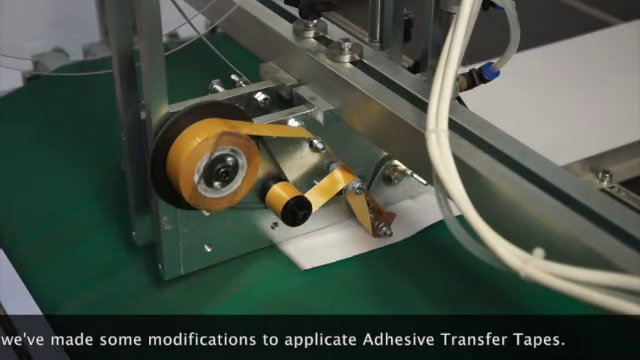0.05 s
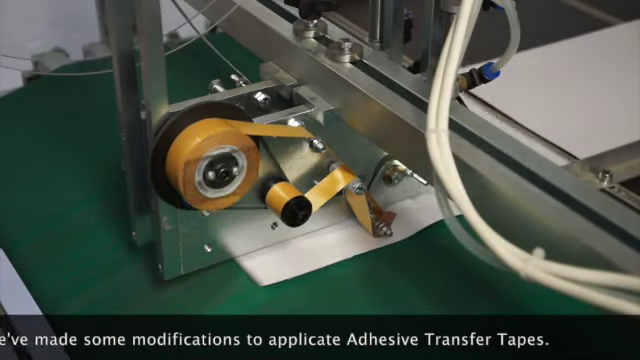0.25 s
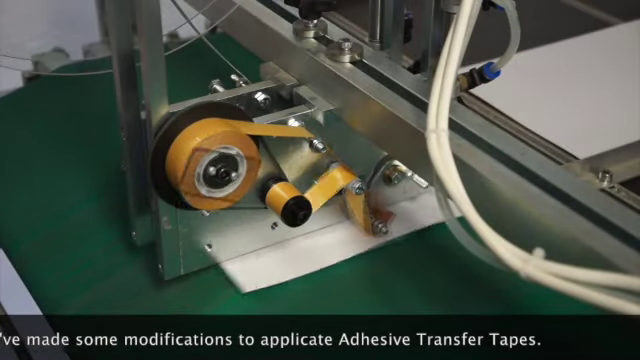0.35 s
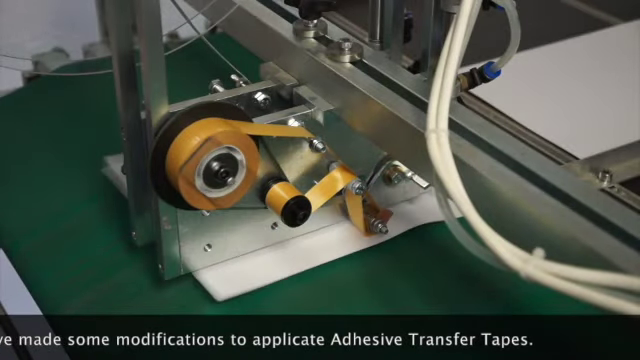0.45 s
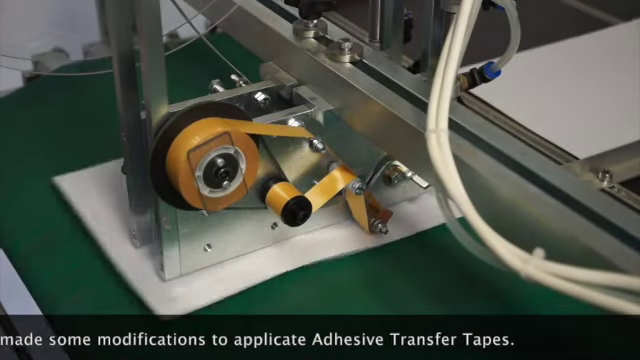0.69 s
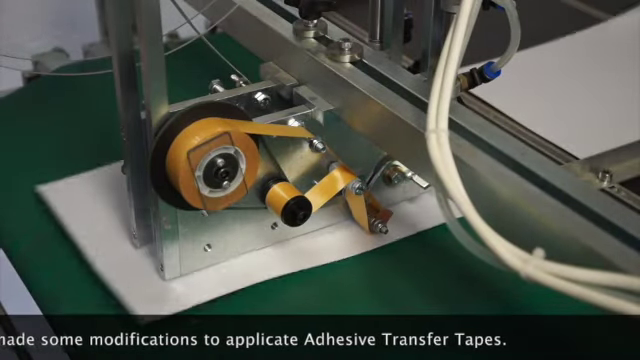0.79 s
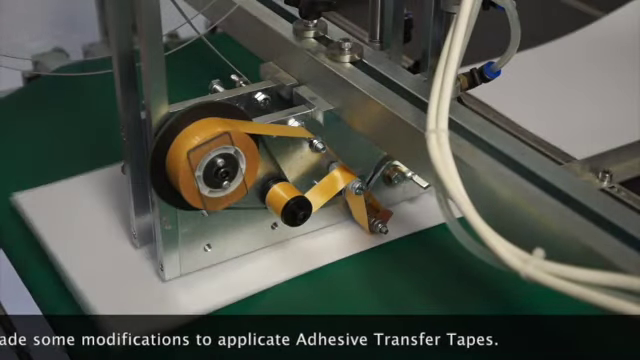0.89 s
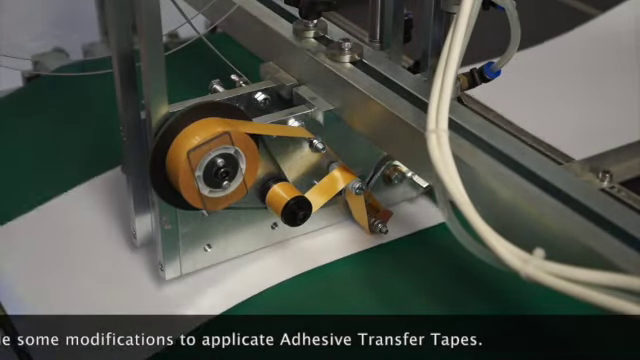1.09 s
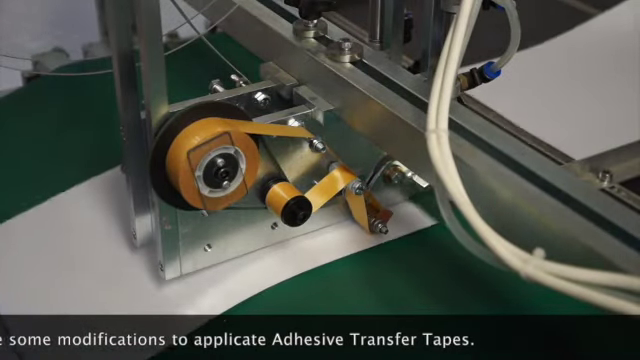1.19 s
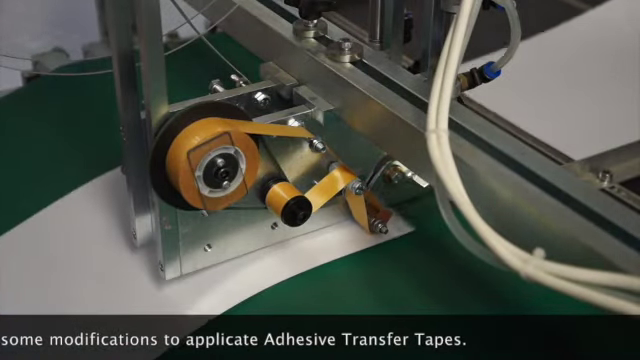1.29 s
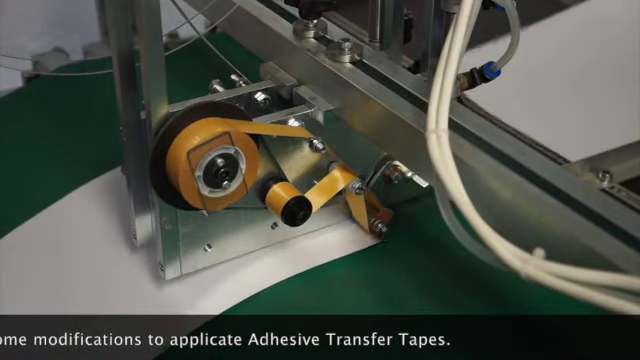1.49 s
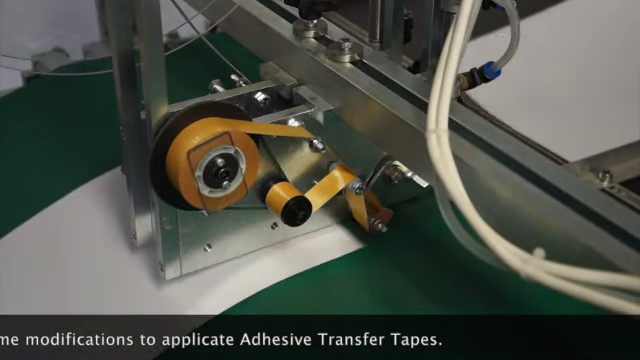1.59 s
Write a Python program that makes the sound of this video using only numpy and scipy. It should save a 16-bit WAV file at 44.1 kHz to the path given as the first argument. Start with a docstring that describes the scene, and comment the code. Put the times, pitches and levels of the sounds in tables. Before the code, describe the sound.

A tape applicator machine runs straight ahead, its conveyor droning under a thin, high motor whine throughout. Sticky tape crackles and squeaks briefly until about 0.3 seconds, when a steel cutter snaps loudly and rings, releasing an air hiss that fades by 0.6. The background dips, then slowly recovers. From about 0.7 to 1.5 seconds, rollers clack unevenly against the metal frame, with a short workshop echo.

```python
"""Sticky tape crackles and squeaks off its reel, over a conveyor belt's drone and a thin motor whine.
Then an air-driven cutter comes down: its steel chatters, snaps and rings, and the air hisses out.
The sheet runs on and the rollers clack, shaking the machine's frame.
A limiter turns everything down at the loud snap and slowly brings it back up."""
import sys
import numpy as np
from scipy import signal
from scipy.fft import rfft, irfft
from scipy.io import wavfile
from scipy.ndimage import uniform_filter1d, minimum_filter1d

SR = 44100
rng = np.random.default_rng(int(sys.argv[2]) if len(sys.argv) > 2 else 0)


def waveform_to_disk(signal):
    """Save audio, clipped to [-1, 1], as 16-bit WAV at the path in sys.argv[1]."""
    frames = np.transpose(np.atleast_2d(signal))
    scaled = np.clip(frames, -1, 1) * 32767
    samples = np.round(scaled).astype(np.int16)
    wavfile.write(sys.argv[1], SR, samples)


N = 72765
TIME = np.arange(N) / SR
STOP_S = 0.328  # the cutter hits its stop


def undb(db):
    """Turn decibels into a volume multiplier."""
    return 10 ** (np.asarray(db) / 20)


def noise():
    """Plain hiss (white noise) of strength 1."""
    return rng.standard_normal(N)


def wander(rate_hz):
    """A smooth random wobble, roughly 1 either way."""
    hold = int(SR / rate_hz)
    steps = np.repeat(rng.standard_normal(N // hold + 2), hold)
    return uniform_filter1d(uniform_filter1d(steps, hold), hold)[:N] * 4 / 3


def fade(start_s, decay_s):
    """Jump to full level, then fall to about a third every decay_s."""
    age = TIME - start_s
    return (age >= 0) * np.exp(-np.maximum(age, 0) / decay_s)


def convolve(x, response):
    """Let every sample of x set off its own copy of the response."""
    return signal.fftconvolve(x, response)[:N]


def colour(x, points, size=4096):
    """Shape the tone along (f/Hz, level/dB) points; white noise keeps its overall power."""
    hz, db = np.array(points, float).T
    f = np.maximum(np.fft.rfftfreq(size, 1 / SR), 1)
    cepstrum = irfft(np.log(undb(np.interp(np.log(f), np.log(hz), db))))
    # fold it in half so the filter never sounds ahead of its input
    cepstrum[1:size // 2] *= 2
    cepstrum[size // 2 + 1:] = 0
    response = irfft(np.exp(rfft(cepstrum)))
    return convolve(x, response / np.linalg.norm(response))


def ring(modes, start_s=0):
    """The dying notes of a struck object; each drops 60 dB over its ring time."""
    age = TIME - start_s
    return sum(undb(db) * fade(start_s, ring_s / np.log(1000)) * np.sin(2 * np.pi * hz * age)
               for hz, db, ring_s in modes)


def tones(notes, waver_db, drift_hz):
    """Held notes that waver a little in level and pitch."""
    total = 0
    for hz, db in notes:
        level = np.sqrt(2) * undb(db + waver_db * wander(9.25))
        cycles = rng.random() + np.cumsum(hz + drift_hz * wander(12.03)) / SR
        total += level * np.sin(2 * np.pi * cycles)
    return total


def room(x, echo_db, ring_s=0.33):
    """The sound plus the workshop's short echo."""
    tail = noise() * fade(0.003, ring_s / np.log(1000))
    return x + undb(echo_db) * convolve(x, tail / np.linalg.norm(tail))


def tape(snaps_per_s=9000):
    """The glue lets go in many tiny snaps, surging as the reel is tugged."""
    # tone of the peeling: f/Hz, level/dB
    peel_tone = [(30, -9), (100, -21), (150, 1.5), (200, -10), (280, -4.5), (400, -8.5), (680, -0.5),
                 (1000, -1.5), (1800, -0.5), (2200, 0.5), (3300, 3.5), (4200, -1), (5300, -4), (7200, 5),
                 (9000, 2.5), (11000, -10.5)]
    # loudness of the peeling: t/s, level/dB
    peel_levels = [(0, -35), (.1, -38), (.195, -37), (.225, -35.5), (.29, -35), (.33, -32.5), (.42, -45),
                   (.56, -51)]
    snaps = (rng.random(N) < snaps_per_s / SR) * np.sign(noise())
    snaps *= undb(2 * np.minimum(rng.exponential(size=N), 7))  # a few are much louder
    level_db = np.interp(TIME, *np.array(peel_levels).T) + 2.16 * wander(110.3)
    return colour(snaps / snaps.std(), peel_tone) * undb(level_db)


def belt():
    """The conveyor belt drones and its drive hums."""
    # tone of the drone: f/Hz, level/dB
    drone_tone = [(25, -13), (80, -10), (120, -12.5), (185, -7), (240, 3), (320, -3.5), (420, -6.5),
                  (720, -2.5), (1000, -12), (1400, -10.5), (2200, -10.5), (4500, -11.5), (7500, -7),
                  (9000, -15), (11000, -17)]
    # notes of the drive: f/Hz, level/dB
    hum_notes = [(150, -63.5), (225, -60.5), (299, -54.5), (490, -60.5), (597, -60)]
    drone = colour(noise(), drone_tone) * undb(-42.5 + 0.69 * wander(14.1))
    return drone + tones(hum_notes, waver_db=3, drift_hz=2.98)


def motor(fizz_hz=6130, half_width_hz=560):
    """The motor whines: thin, high notes in a narrow band of fizz."""
    # notes of the whine: f/Hz, level/dB
    whine_notes = [(5656, -49.5), (5805, -50), (5975, -83), (6076, -46), (6345, -49.5), (6395, -64),
                   (6495, -50.5), (6644, -52), (6675, -53), (6794, -60)]
    f = np.fft.rfftfreq(N, 1 / SR)
    band = np.exp(-0.5 * ((f - fizz_hz) / half_width_hz) ** 6)
    fizz = irfft(rfft(noise()) * band, N)
    return tones(whine_notes, waver_db=0.5, drift_hz=1.87) + undb(-45) * fizz / fizz.std()


def squeaks(width_hz=250):
    """The tape gives short, hissy squeaks as it pulls tight."""
    # squeaks: middle t/s, half length/s, f/Hz, level/dB
    rasps = [(0.038, 0.0041, 2930, -38.5), (0.241, 0.012, 3280, -39.5), (0.285, 0.0057, 2660, -35),
             (0.296, 0.0017, 2750, -39)]
    hiss = undb(-4.5) * colour(noise(), [(4000, -29), (7400, 2), (11000, -5)])
    total = 0
    for at, half, hz, db in rasps:
        squeak = signal.lfilter(*signal.iirpeak(hz, hz / width_hz, fs=SR), noise())
        swell = undb(db) * np.exp(-((TIME - at) / half) ** 2)
        total += swell * (squeak / squeak.std() + hiss)
    return total


def cutter():
    """Steel chatters in bright, gritty ticks and rings at its stop; it ticks again on release."""
    # ticks of the steel: t/s, level/dB, f/Hz, half length/s
    chatter = [(.3114, 5.5, 7040, 0.00048), (0.3146, 1, 6900, 0.0006), (.3176, 4.5, 7400, 0.00013),
               (0.3282, 3, 6940, 0.0006), (0.3312, 0.5, 8300, 0.00044), (.3319, 2, 7200, 0.00048),
               (.333, 1, 7200, 0.00045), (.335, -0.5, 7500, .0004), (.3376, 0.5, 7500, 0.00044),
               (0.8861, -14.5, 7600, .00016), (0.8877, -22, 7240, 0.00067)]
    # ringing notes of the cutter: f/Hz, level/dB, ring time/s
    steel_notes = [(258.5, -26.5, 0.43), (303, -27.5, 0.53), (2353, -34, 0.42), (3150, -10.5, 0.057),
                   (3157, -34.5, 0.63), (3420, -29, 0.58), (6660, -21, 0.075), (6830, -11, 0.082),
                   (7138, -28, 0.17), (7330, -15.5, 0.14), (7469, -25, .2), (7560, -39, .28),
                   (7730, -52, .5), (8310, -37, .45), (8328, -43, .5), (10050, -15, 0.063)]
    ticks, grit_power = 0, 0
    for at, db, hz, half in chatter:
        age = TIME - at
        ticks += undb(db) * np.exp(-(age / half) ** 2) * np.cos(2 * np.pi * hz * age)
        grit_power += (undb(db) * fade(at - half, decay_s=0.0073)) ** 2
    hiss = colour(noise(), [(1500, -13.5), (4500, -4), (7000, -1.5), (9000, 0.5), (11000, -16.5)])
    grit = undb(-17) * np.sqrt(grit_power) * hiss
    return room(ticks + grit, echo_db=-7) + ring(steel_notes, STOP_S)


def clacks():
    """The arm and rollers hit the frame; each blow cracks, rattles, rings and thumps."""
    # blows: t/s, level/dB, ring f/Hz, relative thump/dB, relative crack/dB, rattle decay/s
    hits = [(0.3165, 9.5, 875, -3, -10.5, 0.0063), (0.3278, 5, 3050, 1, -1, 0.011),
            (0.717, -15.5, 7500, -22, -21, .015), (0.8598, -8, 1940, -8, -7, 0.0043),
            (.8645, -4, 2000, -10.5, -7, .003), (0.8933, -5.5, 3900, -19, -3, 0.031),
            (1.0439, -11, 3220, -8, -8, 0.0069), (1.089, -21, 3000, -12, -6, 0.0042),
            (1.1135, -23, 2800, 6.5, -5, 0.0083), (1.1458, -13.5, 2600, -12, -4, 0.029),
            (1.1908, -13, 2730, -7, -7, 0.013), (1.2297, -12.5, 2360, -21, 2, 0.0045),
            (1.237, -8, 2820, 4.5, -1.5, .008), (1.3044, -6, 704, -17, -3, 0.0014),
            (1.308, 1.5, 2870, -8.5, -1.5, 0.0064), (1.358, -4, 1670, -3.5, 1.5, 0.0048),
            (1.491, -8, 2730, -4.5, -7.5, 0.0083)]
    # tone of the shaken frame: f/Hz, level/dB
    frame_tone = [(40, -38), (100, -28), (160, -11.5), (260, 2), (450, 3.5), (750, -0.5), (1100, -0.5),
                  (1800, 2.5), (3300, -1.5), (3900, -8.5), (5200, -4), (8000, -5.5), (11000, -11.5)]
    # ringing notes of the frame: f/Hz, level/dB, ring time/s
    frame_notes = [(747, -52, 0.39), (987, -48, 0.31), (1204, -50, 0.32), (1493, -54, 0.28),
                   (1816, -40, 0.081), (2135, -55, .15), (2455, -52, .2), (3040, -50, 0.059),
                   (3284, -53, .12)]
    blows, thumps = np.zeros(N), np.zeros(N)
    for at, db, hz, thump_db, crack_db, rattle_s in hits:
        push = noise() * fade(at + 0.00083, rattle_s)
        push /= np.linalg.norm(push)
        push[int(at * SR)] += undb(crack_db)  # the crack comes just before the rattle
        ringing = signal.lfilter(*signal.iirpeak(hz, Q=1 / 0.49, fs=SR), push)
        blows += undb(db) * (push + undb(6.5) * ringing) / 2
        thumps[int(at * SR)] += undb(db + thump_db)
    bass_cut = signal.butter(2, 190, "high", fs=SR, output="sos")
    knock = signal.sosfilt(bass_cut, ring([(278.7, -26, 0.071)]))
    frame = colour(blows, frame_tone) + convolve(blows, ring(frame_notes))
    return room(frame + convolve(thumps, knock), echo_db=-8.5)


def head():
    """The cutter's head thuds as the air cylinder drives it down."""
    # low notes of the head: f/Hz, level/dB, ring time/s
    thud_notes = [(143, -38.5, .09), (256, -25.5, .07), (490, -27.5, 0.022), (646, -24.5, 0.044)]
    return ring(thud_notes, start_s=0.3174)


def air(fall_db_per_s=67.5, close_at_s=0.556, closing_s=0.049):
    """The cylinder lets its air out: a puff, then a hiss that sinks with the pressure and shuts off."""
    # tone of the escaping air: f/Hz, level/dB
    air_tone = [(60, -42), (150, -12), (300, -6.5), (700, -17), (1100, -10.5), (2500, -10.5), (3300, -5),
                (4000, -7.5), (5800, -9.5), (7000, -3.5), (7900, 1), (9200, -8), (11000, -22.5)]
    hiss = colour(noise(), air_tone)
    flow = (TIME > STOP_S) * undb(-19.5 - fall_db_per_s * (TIME - STOP_S))
    flow *= np.exp(-np.maximum(TIME - close_at_s, 0) / closing_s)
    flutter = undb(0.87 * wander(88.7))
    puff = undb(-12.5) * fade(STOP_S, decay_s=0.0063)
    return hiss * np.hypot(flow * flutter, puff)


def scene():
    """The machine is straight ahead; echoes spread it a little to left and right."""
    # stereo width: f/Hz, level/dB of the sides compared with the middle
    width = [(60, -11.5), (200, -19.5), (600, -12), (1400, -11.5), (2800, -17), (5000, -33), (6500, -29),
             (8500, -17), (11000, -12.5)]
    middle = tape() + belt() + motor() + squeaks() + cutter() + clacks() + head() + air()
    echoes = noise() * fade(0.001, decay_s=0.02)
    side = convolve(middle, echoes / np.linalg.norm(echoes))
    f = np.maximum(np.fft.rfftfreq(2 * N, 1 / SR), 1)
    hz, db = np.array(width).T
    side_gain = undb(np.interp(np.log(f), np.log(hz), db))
    side = irfft(rfft(side, 2 * N) * side_gain)[:N]
    return np.array([middle + side, middle - side])


def record(dry, ceiling_db=-3, recover_db_per_s=11.5, top_hz=11100):
    """A limiter drops the volume fast at loud peaks and recovers slowly; the top treble is cut off."""
    level_db = 20 * np.log10(np.abs(dry.mean(axis=0)) + 1e-9)
    excess_db = np.maximum(level_db - ceiling_db, 0)
    recovery_db = recover_db_per_s * TIME
    gain_db = recovery_db - np.maximum.accumulate(excess_db + recovery_db)
    gain_db = uniform_filter1d(minimum_filter1d(gain_db, size=64), size=64)  # ease into each drop
    treble_cut = signal.ellip(10, 0.2, 70, top_hz, fs=SR, output="sos")
    return signal.sosfilt(treble_cut, dry * undb(gain_db))


dry = scene()
out = record(dry)
waveform_to_disk(out)
```